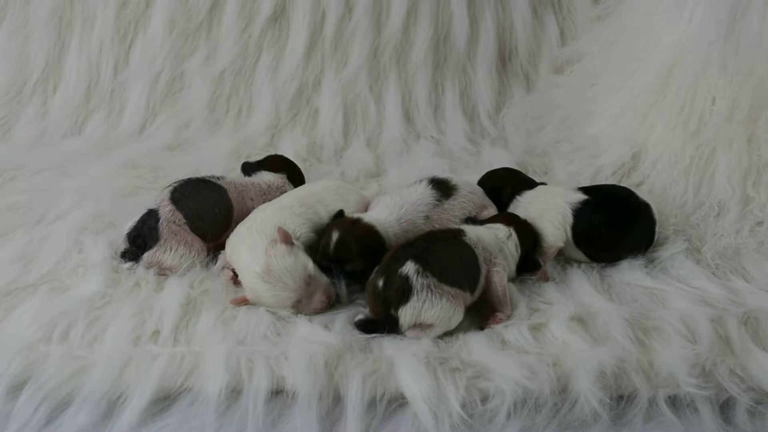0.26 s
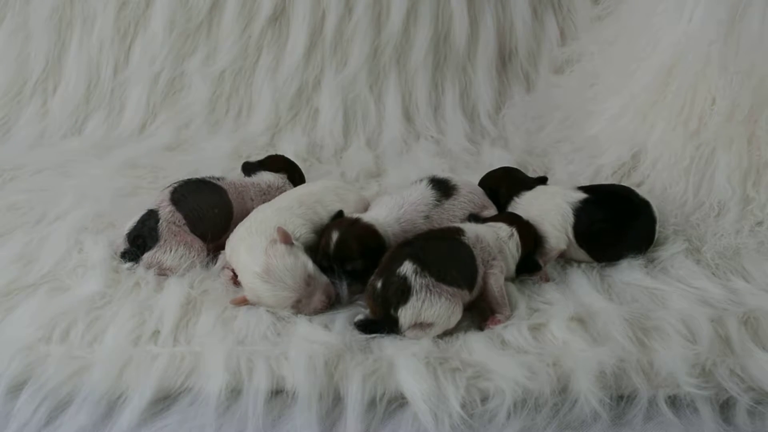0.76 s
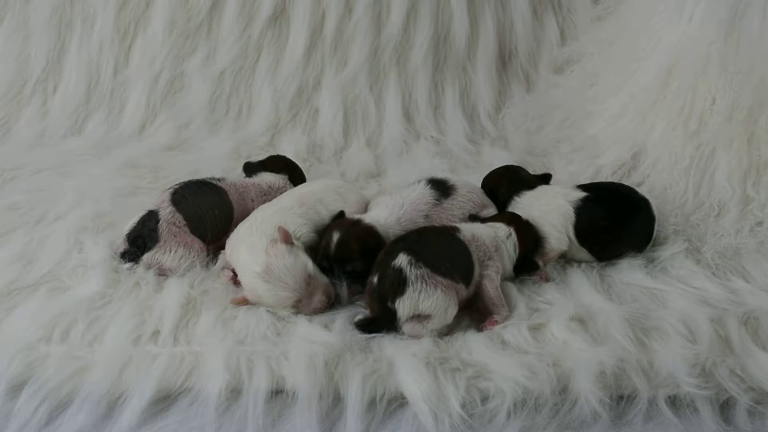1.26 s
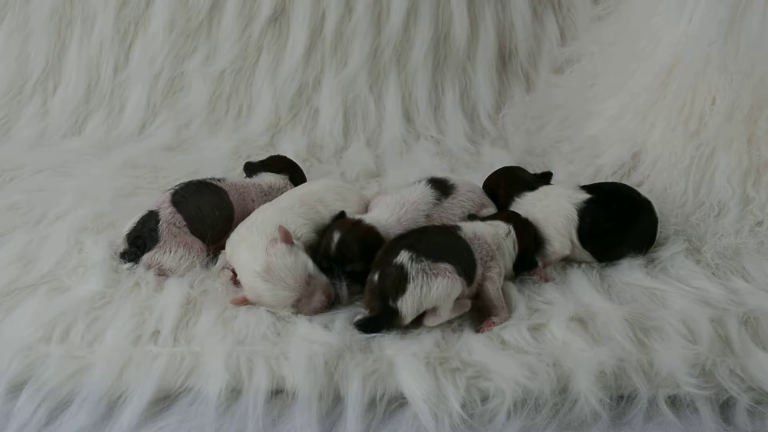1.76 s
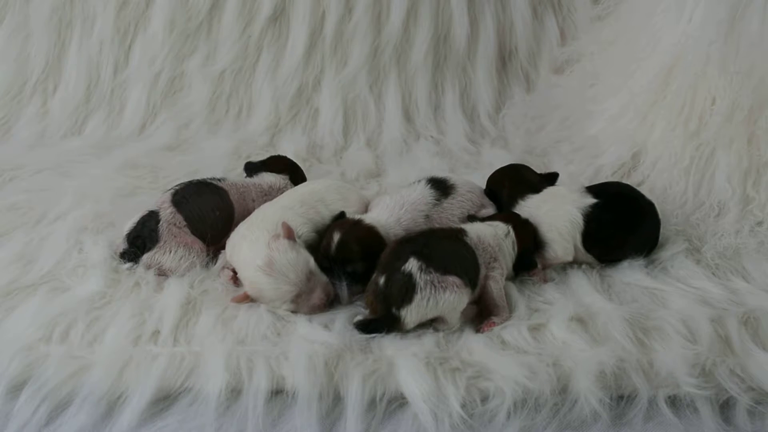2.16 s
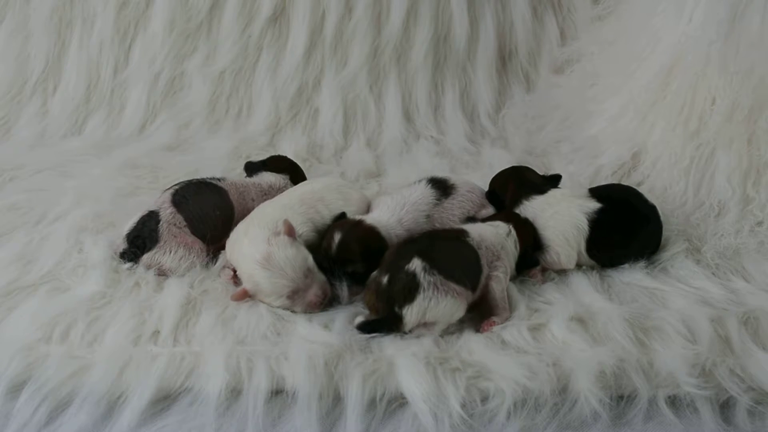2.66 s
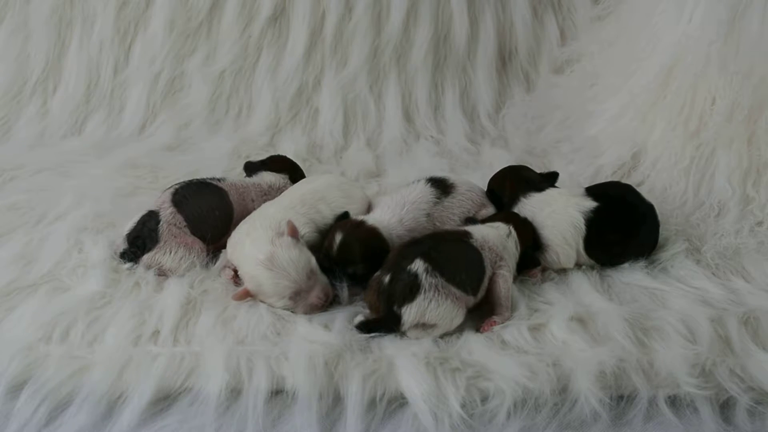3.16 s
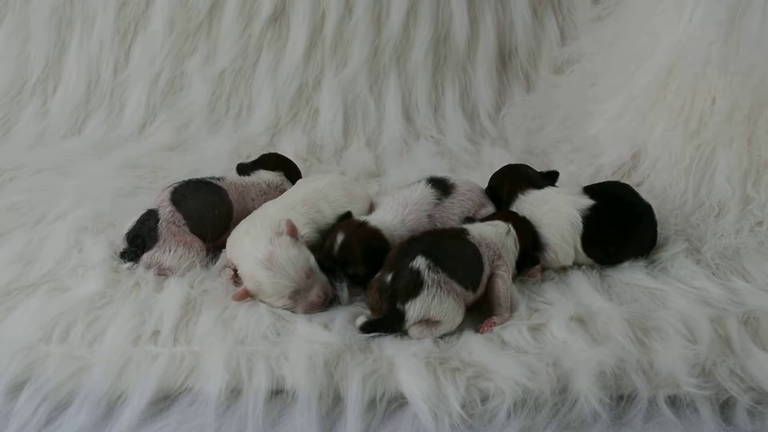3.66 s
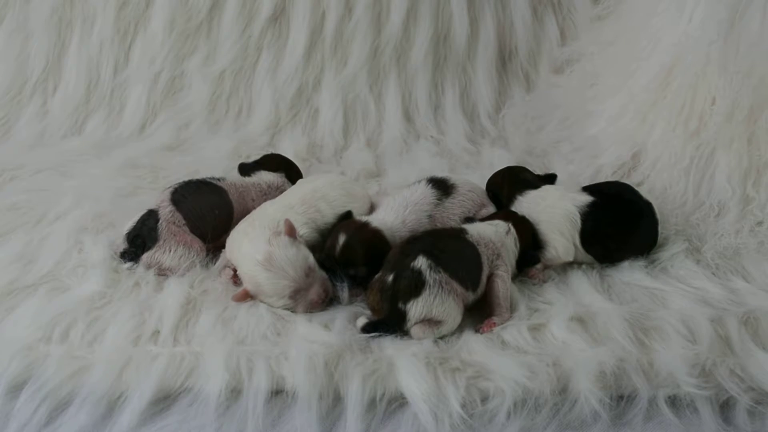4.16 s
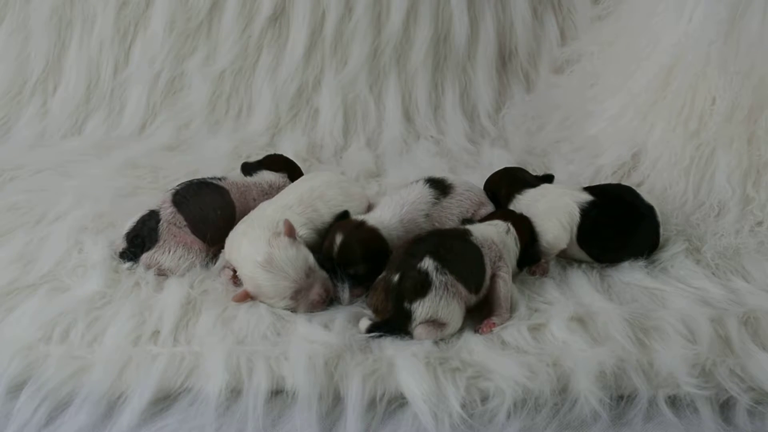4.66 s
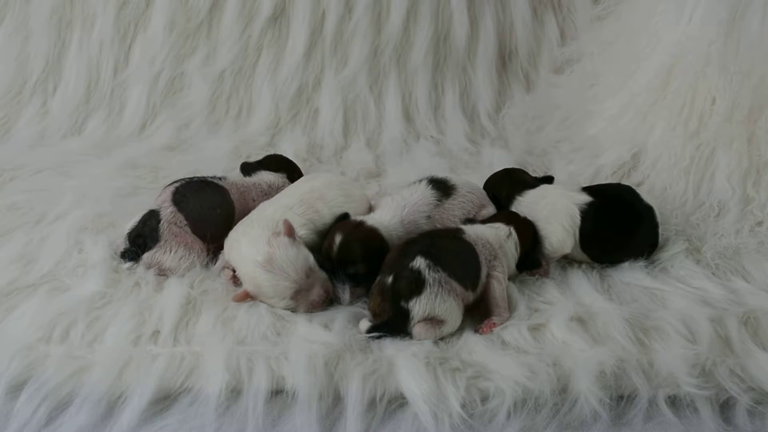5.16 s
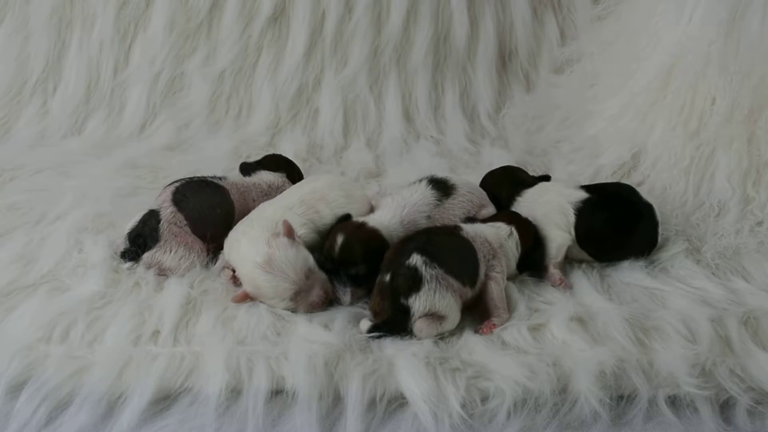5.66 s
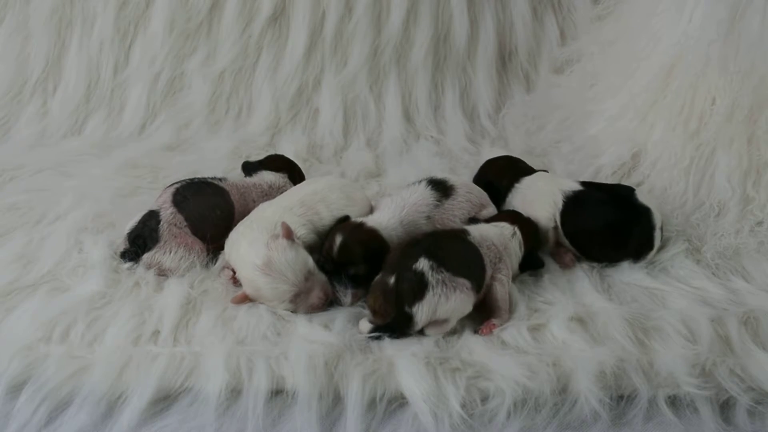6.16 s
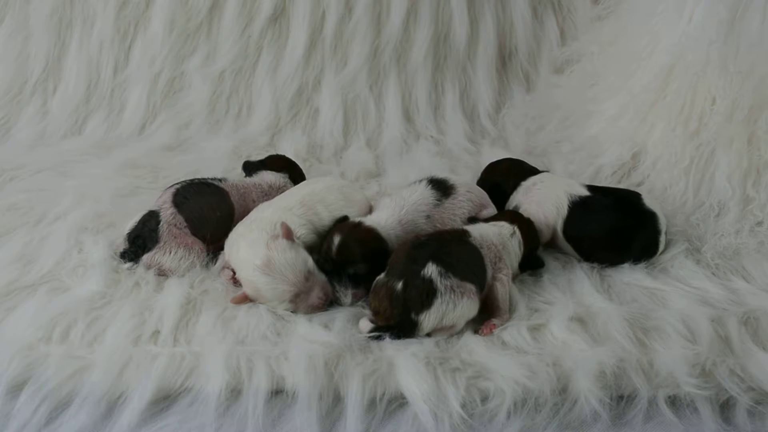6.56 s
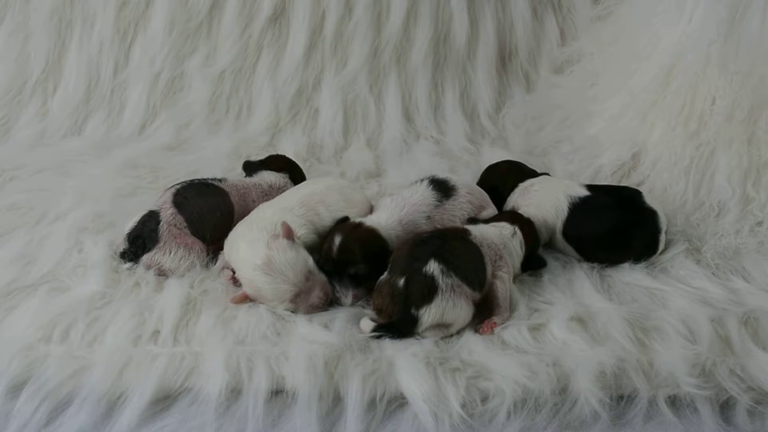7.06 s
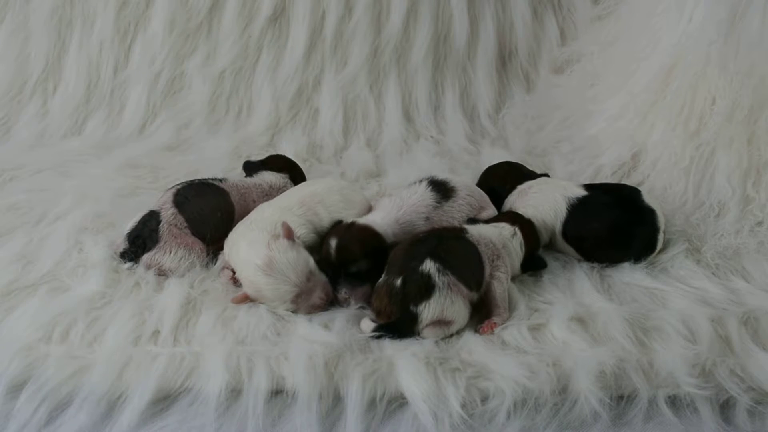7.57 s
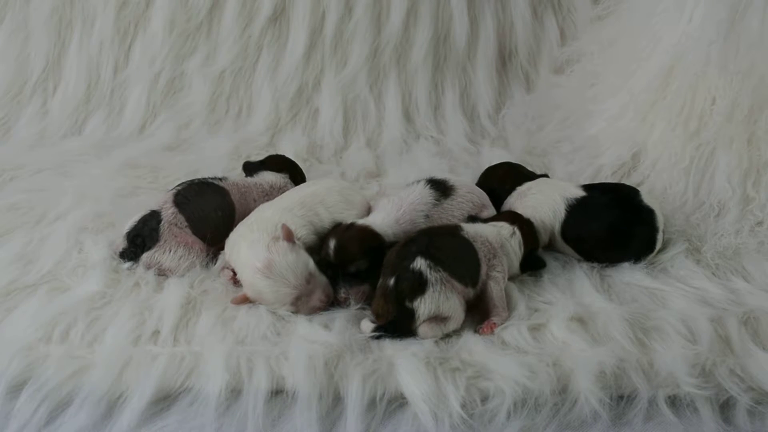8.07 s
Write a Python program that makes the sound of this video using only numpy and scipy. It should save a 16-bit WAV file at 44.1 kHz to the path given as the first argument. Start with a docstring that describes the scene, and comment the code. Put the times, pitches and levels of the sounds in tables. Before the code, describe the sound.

Newborn puppies cry about a metre from a phone in a small, softly furnished room, over steady soft hiss and very faint hum. Around 0.4 to 1.1 s come weak, short whimpers. At 1.2 s a long, piercing squeal starts abruptly, climbs with hoarse cracks until about 1.8 s, then slides down to 2.2 s, overlapped by a higher squeak and ending beside a rough grunt. After a brief lull with small grunts, a squeak at 2.8 s leads into a long wavering whine, rising then sinking until 4.5 s, with squeaks and whimpers across it. More squeaks follow to 5.2 s; a strong raspy whine and throaty grunts fill 5.2 to 6 s. A low, quiet whimper drifts from 6.2 to 7 s. From 7 s to the end near 8.3 s, grunts, weak whines and short whimpers return with a trace of high airy breath.

```python
"""Newborn puppies heaped on a thick fur rug, a metre from a phone: four voices overlap in thin wavering cries.
Each cry is a harmonic series on a gliding pitch curve, filtered by a tiny throat and mouth.
Hoarse grunts, uneven pulses and noise through throat resonances, come between and under the cries.
A narrow band of airy noise joins the last cries; a short diffuse tail answers as in a small soft room.
Steady coloured noise and faint mains hum lie beneath."""
import sys
import numpy as np
from scipy import signal
from scipy.fft import rfft, irfft
from scipy.io import wavfile
from scipy.ndimage import uniform_filter1d

SR = 44100
rng = np.random.default_rng(int(sys.argv[2]) if len(sys.argv) > 2 else 0)


def generate_wav(signal):
    """Clip the signal to [-1, 1] and save it as 16-bit WAV at the path in sys.argv[1]."""
    frames = np.transpose(np.atleast_2d(signal))
    scaled = np.clip(frames, -1, 1) * 32767
    pcm = np.round(scaled).astype(np.int16)
    wavfile.write(sys.argv[1], SR, pcm)


N = 367353

# Noise spectra, relative levels: frequency_hz, density_db (per Hz); mid is shared by both channels,
# side is opposite in sign between them
HISS_MID_SPECTRUM = [(15, -58), (25, -39.5), (104, -9.5), (198, -9.5), (274, -2.5), (631, -1.5),
                     (721, -2.5), (825, -4), (944, -3), (2170, -9), (2620, -11), (4740, -17.5),
                     (15500, -32.5)]
HISS_SIDE_SPECTRUM = [(15, -51), (25, -35), (140, -14), (289, -6.5), (684, -3.5), (894, -4.5), (970, -3.5),
                      (1050, -4.5), (3340, -11), (15500, -29.5)]
HISS_MID_DB, HISS_SIDE_DB = -56, -60.5  # rms
# Mains hum lines: frequency_hz, rms_db
HUM_LINES = [(60, -97), (120, -83.5), (300, -74)]
# Airy noise of the last cries: time_s, centre_hz, rms_db
AIR_TRACK = [(7.049, 10300, -95), (7.3, 10800, -82), (7.6, 11600, -84), (8.33, 11800, -83)]
AIR_WIDTH_HZ = 1200  # rate of the random levels that spread the band
# Grunts: start_s, length_s, level_db, change_db (from start to end)
GRUNT_EVENTS = [(0.38, 1, -64, -5), (2.145, 0.22, -42, -14), (2.465, 0.062, -52.5, -1),
                (2.652, .18, -56, 4.5), (2.95, 0.39, -61.5, 6), (3.276, 0.32, -54, -6),
                (3.987, 0.32, -57, 1), (4.378, 0.32, -53.5, -1), (4.7, 0.5, -55.5, -5.5),
                (5.206, 0.34, -43, -7.5), (5.478, 0.16, -40.5, -5.5), (5.64, 0.37, -44, -2),
                (6.08, 0.62, -65.5, 4.5), (6.56, 0.71, -57.5, -11), (7.03, 0.46, -47, -1),
                (7.492, 0.37, -49, 1.5), (7.893, 0.37, -54.5, -1)]
# Resonances of a grunting throat: frequency_hz, width_hz (of one pass), gain_db
GRUNT_RESONANCES = [(630, 490, -5.5), (1100, 760, 0.5), (1700, 840, 0), (2906, 470, -9.5),
                    (3530, 1200, -20.5), (11600, 1800, -39)]
# A longer grunt swells in more slowly: fixed attack plus a share of its length; release follows the length
GRUNT_ATTACK_S, GRUNT_ATTACK_SHARE, GRUNT_RELEASE_S = 0.017, 0.17, 0.076
# Hoarse stretches of fluttering folds: start_s, end_s, slips_per_s (mean rate), depth (0-1)
HOARSE_STRETCHES = [(1.495, 1.535, 50, .8), (1.58, 1.65, 43, .7), (1.705, 1.745, 50, .6),
                    (3.8, 3.9, 45, .3), (5.5, 5.6, 45, .35), (5.8, 5.95, 60, .25)]
# Raspy stretches of uneven cycles: start_s, end_s, rasp (0-1)
RASPY_STRETCHES = [(1.49, 1.54, .7), (1.58, 1.66, .7), (1.7, 1.75, .6), (2.08, 2.4, .5), (2.93, 3.45, .33),
                   (3.84, 3.95, .5), (4.26, 4.53, .7), (4.98, 5.3, .4), (5.3, 5.8, .28), (5.8, 6.0, .5),
                   (7.04, 7.9, .35), (7.9, 8.28, .15)]
RASP_JITTER, RASP_DB = .022, 3  # scale of random pitch (fraction) and strength (dB) at full rasp

# Pitch curves, one list per cry: time_s, pitch_hz
LONG_SQUEAL_CURVES = [
    [(1.226, 935), (1.236, 918), (1.296, 1004), (1.408, 1038), (1.454, 1169), (1.496, 1194), (1.544, 1296),
     (1.578, 1240), (1.634, 1404), (1.66, 1312), (1.78, 1487), (1.816, 1575), (1.846, 1412), (1.884, 1354),
     (1.932, 1146), (2.08, 1083), (2.13, 823), (2.17, 733), (2.218, 574), (2.239, 441)],
]
SQUEAK_CURVES = [
    [(2.007, 1602), (2.031, 1617), (2.059, 1838), (2.143, 1838), (2.195, 1576), (2.247, 1767),
     (2.319, 1480), (2.399, 1390)],
    [(2.814, 1275), (2.842, 1420), (2.873, 1656), (2.889, 1740)],
    [(3.05, 1476), (3.1, 1545), (3.17, 1324), (3.22, 1271), (3.3, 1376)],
    [(3.355, 1173), (3.4, 1010), (3.445, 981), (3.49, 1122), (3.55, 1081), (3.6, 1283), (3.64, 1105),
     (3.69, 1196), (3.72, 1160), (3.76, 1300), (3.795, 1180)],
    [(4.163, 830), (4.179, 856), (4.21, 1106), (4.246, 1210), (4.318, 830)],
    [(4.37, 894), (4.478, 1605), (4.518, 1203), (4.542, 1070), (4.59, 1006), (4.614, 923.5), (4.705, 955),
     (4.773, 997.6), (4.809, 993)],
    [(4.817, 940), (4.889, 716), (4.977, 703), (5.021, 988), (5.053, 1018), (5.1, 905), (5.124, 746),
     (5.188, 800)],
]
WHINE_CURVES = [
    [(2.933, 368), (2.959, 365.4), (3.013, 337.4), (3.161, 416), (3.211, 374.4), (3.305, 400),
     (3.331, 440.8), (3.391, 425.5), (3.485, 548), (3.515, 546.4), (3.601, 648), (3.651, 637.6),
     (3.731, 726), (3.879, 718.6), (3.907, 654), (3.947, 703.5), (4.009, 695), (4.091, 738.4), (4.127, 684),
     (4.171, 567), (4.217, 584), (4.253, 547), (4.297, 475.3), (4.323, 404.6), (4.445, 360.7), (4.467, 378),
     (4.546, 357.3)],
    [(4.55, 363), (4.598, 448), (4.629, 680), (4.677, 768)],
    [(5.24, 440.6), (5.292, 489), (5.32, 627), (5.34, 696), (5.47, 655), (5.508, 711), (5.546, 813.5),
     (5.62, 703.6), (5.686, 685.5), (5.756, 776), (5.78, 726), (5.848, 514), (5.902, 497), (5.966, 378.5)],
    [(7.252, 371), (7.294, 359.4), (7.332, 407.3), (7.404, 418.7), (7.508, 363.6), (7.568, 419.5),
     (7.626, 368.7), (7.704, 372), (7.758, 322.3), (7.84, 311.7)],
    [(7.87, 396), (7.894, 478), (7.906, 498), (7.97, 406), (8.042, 483), (8.114, 431), (8.161, 516)],
    [(8.173, 641), (8.213, 641.7), (8.249, 543), (8.305, 614), (8.329, 618)],
]
WHIMPER_CURVES = [
    [(0.431, 573), (0.467, 543), (0.503, 607), (0.547, 610)],
    [(0.563, 702), (0.591, 599), (0.615, 747), (0.655, 637)],
    [(0.75, 716), (0.79, 636.5), (0.846, 874), (0.882, 704), (0.966, 663), (1.034, 415), (1.098, 590)],
    [(3.352, 857), (3.396, 688), (3.42, 801), (3.456, 898), (3.544, 695), (3.6, 845), (3.64, 759),
     (3.759, 844), (3.799, 825)],
    [(3.843, 761), (3.875, 648), (3.923, 510.5), (4.007, 521.6), (4.039, 485), (4.119, 458)],
    [(4.873, 580), (4.941, 548), (4.985, 618), (5.033, 497), (5.076, 494.5), (5.128, 446), (5.176, 470)],
    [(5.192, 613), (5.208, 599), (5.272, 762), (5.3, 765)],
    [(5.332, 551), (5.36, 566.7), (5.436, 512.4), (5.492, 543.5), (5.6, 553), (5.823, 560), (5.859, 508.4),
     (5.903, 509), (5.931, 555.2), (6.126, 505.3), (6.17, 466), (6.242, 344)],
    [(6.246, 351.2), (6.306, 389.3), (6.362, 342), (6.421, 396.7), (6.621, 430), (6.697, 400.4),
     (6.79, 395), (6.852, 403), (6.88, 375.3), (6.988, 366), (7.06, 341)],
    [(7.04, 517), (7.188, 528), (7.2, 550), (7.24, 511)],
    [(8.042, 477.3), (8.062, 484), (8.09, 535.6), (8.149, 484)],
]
# Source and mouth of each cry: brightness_db (per octave), mouth_lift_db,
# and a list of place (0-1 through the cry), strength_db, mouth_hz
LONG_SQUEAL_SHAPES = [(0.16, 2, [(0, -48, 1860), (.2, -47, 960), (.4, -41.5, 1420), (.6, -36.5, 2830),
                      (.72, -39.5, 3300), (.9, -41, 1660), (1, -53.5, 1190)])]
SQUEAK_SHAPES = [ (-4.5, 1.5, [(0, -46, 1590), (.75, -47.5, 1580), (1, -73, 1500)]),
                 (-8, 2, [(0, -67, 1300), (.7, -50, 1600), (1, -63, 1700)]), (-4, 1.9, [(0, -55, 1500),
                 (.35, -46, 1400), (.7, -55, 1250), (1, -47, 1350)]), (-4.5, 14.4, [(0, -62, 3260),
                 (.1, -57, 3206), (.5, -52.5, 3430), (.85, -46, 3500), (1, -67, 3700)]),
                 (0.5, 5, [(0, -52.5, 1660), (.4, -47.5, 1220), (1, -49, 1660)]),
                 (1.5, 3.05, [(0, -58.5, 900), (.25, -46, 1603), (.38, -51, 2100), (.58, -49, 1880),
                 (1, -52.5, 2000)]), (-1.5, 5.2, [(0, -50.5, 1900), (.15, -52, 1520), (.65, -50, 2050),
                 (.8, -52, 1610), (1, -52.5, 1540)]), ]
WHINE_SHAPES = [ (-0.7, 2.5, [(0, -53.5, 1090), (.15, -47, 1220), (.38, -42.5, 1240), (.46, -46, 1240),
                (.55, -42, 1450), (.66, -46.5, 1430), (.73, -43, 1390), (.87, -46, 1199), (1, -54, 1090)]),
                (-1.6, 2, [(0, -51, 904), (.5, -46, 900), (1, -58, 750)]), (0.37, 1.1, [(0, -49.5, 1290),
                (.12, -43.5, 1320), (.45, -42, 1600), (.65, -43, 1500), (.88, -44.5, 1500),
                (1, -46, 1100)]), (0.12, 2.6, [(0, -54.5, 1500), (.25, -54, 1260), (.55, -54, 1480),
                (1, -58.5, 1202)]), (0.43, 2.5, [(0, -52, 1200), (.4, -55.5, 1260), (1, -58.5, 1912)]),
                (-0.3, 4.6, [(0, -53, 631), (.7, -59.5, 1140), (1, -50, 1247)]), ]
WHIMPER_SHAPES = [ (-1.5, 1.7, [(0, -58, 1100), (.7, -53.5, 1200), (1, -59, 1250)]),
                  (-8, 1.8, [(0, -53, 650), (.3, -46, 650), (1, -60, 700)]), (-2.5, 7.9, [(0, -57, 673),
                  (.6, -58, 655), (.75, -55.5, 990), (1, -69, 1200)]), (-2, 4.2, [(0, -49.5, 1600),
                  (.55, -46.5, 1630), (.78, -62, 1600), (.88, -46.5, 1640), (1, -57, 1570)]),
                  (2.5, 2.9, [(0, -44.5, 1480), (.3, -54, 1490), (1, -64, 1400)]),
                  (-4, 3.5, [(0, -64, 1100), (.5, -53.5, 1000), (1, -54.5, 950)]), (4, 2.6, [(0, -61, 1200),
                  (.6, -54, 1510), (1, -56, 1540)]), (0, 5, [(0, -58, 1120), (.13, -70, 1050),
                  (.25, -53.5, 1590), (.5, -52, 1070), (.75, -51, 1600), (.87, -52, 1030), (1, -53, 1060)]),
                  (-2.5, 6.1, [(0, -57.5, 1080), (.25, -53.5, 1540), (.34, -56, 1190), (.5, -56.5, 1220),
                  (.7, -55.5, 788), (.8, -58.5, 1130), (1, -62, 1098)]), (0, 2.7, [(0, -66, 1050),
                  (.5, -63, 1550), (1, -53, 1050)]), (-1.5, 3.7, [(0, -58, 1000), (.4, -49, 1044),
                  (1, -79, 1000)]), ]
# Throat and mouth transfer function of each pup: frequency_hz, gain_db
LONG_SQUEAL_TRACT = [(450, 6), (1000, 1), (1500, 2), (2000, 2.5), (3200, -2.5), (3800, -20.5), (5000, -43),
                     (6200, -44), (7200, -40), (9000, -32), (10500, -48), (12000, -46), (13500, -36),
                     (15500, -44)]
SQUEAK_TRACT = [(700, -8.5), (1000, 3), (1500, 2), (2000, -0.5), (3500, -5.5), (4300, -15.5), (5000, -39),
                (6000, -51), (9500, -44), (11000, -29), (12800, -36), (14000, -53)]
WHINE_TRACT = [(370, -9), (740, 1), (1100, 1), (1500, 2.5), (1900, 0), (2400, -11), (3000, -12.5),
               (3600, -17.5), (4300, -27), (5000, -46), (10000, -44.5), (11700, -39), (13000, -47),
               (15000, -57)]
WHIMPER_TRACT = [(400, -10), (600, -3.5), (800, 3.5), (1100, 1.5), (1500, 1.5), (2000, -6), (2500, -22),
                 (3500, -14.5), (5000, -62)]
# A pup that pushes its pitch up also pushes louder: dB per octave above the cry's median pitch
LONG_SQUEAL_EFFORT_DB, SQUEAK_EFFORT_DB, WHINE_EFFORT_DB, WHIMPER_EFFORT_DB = 7.5, 4, 4.5, 4
MOUTH_OCTAVES = 0.28  # half width of the mouth resonance, where its lift in dB falls to 1/e
GLIDE_LOSS_DB = .35  # the voice thins in fast glides: dB lost per octave a second
# Partials drop out deeply but swell only a little: shares of the patchiness, and cap on the random swell
LOW_PATCH_SHARE, HIGH_PATCH_SHARE, PATCH_TOP = .45, 1.8, .7
POP_DB, POP_S = 6.5, 0.025  # folds that snap into voice start loud: excess level and its decay time
ROOM_T60_S, ROOM_DB = 0.18, -11  # reverberation time, and tail energy relative to the dry sound
TOP_HZ = 15550  # upper band edge of the phone


def undb(db):
    """Amplitude ratio is ten to the power of level over twenty."""
    return 10 ** (np.asarray(db) / 20)


def level(x, db):
    """Scaling by the inverse rms sets the mean power."""
    return x * undb(db) / np.sqrt(np.mean(x ** 2))


def colour(table, hz):
    """A spectral envelope: dB interpolated on a log-frequency axis."""
    f, db = np.transpose(table)
    return np.interp(np.log(np.maximum(hz, 1)), np.log(f), db)


def walk(rate_hz, size=N):
    """Low-pass random fluctuation: levels held 1 / rate s and averaged twice, with a spread near 1."""
    hold = max(int(SR / rate_hz), 1)
    steps = np.repeat(rng.standard_normal(size // hold + 1), hold)
    return 1.3 * uniform_filter1d(uniform_filter1d(steps, hold), hold)[:size]


def ring(x, hz, width_hz):
    """Cascaded resonance: two passes of one peak steepen its skirts."""
    b, a = signal.iirpeak(hz, hz / width_hz, fs=SR)
    return signal.lfilter(b, a, signal.lfilter(b, a, x))


def hiss(table, db):
    """Stationary noise: a white spectrum weighted by a spectral envelope."""
    spectrum = rfft(rng.standard_normal(N))
    bin_hz = np.arange(len(spectrum)) * SR / N
    return level(irfft(spectrum * undb(colour(table, bin_hz)), N), db)


def hum():
    """Mains hum: a sum of steady sinusoids, each with rms equal to its peak over root two."""
    t = np.arange(N) / SR
    return sum(np.sqrt(2) * undb(db) * np.sin(2 * np.pi * hz * t) for hz, db in HUM_LINES)


def room(x, db):
    """Reverberation: convolution with exponentially decaying noise, delayed 8 ms and lacking treble."""
    t = np.arange(int(.5 * SR)) / SR
    decay = np.exp(-np.log(1000) * t / ROOM_T60_S)
    tail = rng.standard_normal(len(t)) * decay * (t > .008)
    tail = signal.lfilter(*signal.butter(1, 3500, fs=SR), tail)
    return signal.fftconvolve(x, tail * undb(db) / np.sqrt(np.sum(tail ** 2)))[:N]


def air():
    """Quadrature modulation: two random envelopes on a climbing carrier make a narrow band of leaking air."""
    t = np.arange(N) / SR
    s, hz, db = np.transpose(AIR_TRACK)
    phase = 2 * np.pi * np.cumsum(np.interp(t, s, hz)) / SR
    band = walk(AIR_WIDTH_HZ) * np.sin(phase) + walk(AIR_WIDTH_HZ) * np.cos(phase)
    return level(band, 0) * undb(np.interp(t, s, db)) * (t > s[0])


def grunts():
    """Source and filter: uneven pulses on a wandering low pitch, and leaking air, excite a slack throat."""
    t = np.arange(N) / SR
    push = 0
    for start, length, db, change_db in GRUNT_EVENTS:
        rise = (t - start) / (GRUNT_ATTACK_S + GRUNT_ATTACK_SHARE * length)
        fall = (start + length - t) / GRUNT_RELEASE_S + 1
        gate = np.clip(np.minimum(rise, fall), 0, 1)
        push = push + gate * undb(db + change_db * np.clip((t - start) / length, 0, 1))
    pitch_hz = 270 * (1 + .1 * walk(7) + .035 * walk(150))
    cycles = np.cumsum(pitch_hz) / SR
    # one pulse per cycle, of random strength
    pulses = np.diff(np.floor(cycles), prepend=0) * undb(2.5 * rng.standard_normal(N))
    # the air weakens through each cycle
    leak = np.exp(-(cycles % 1) / 0.98) * rng.standard_normal(N)
    source = level(pulses, 0) + level(leak, -6)
    # neighbouring resonances add with opposite signs
    tract = sum((-1) ** k * undb(gain_db) * ring(source, hz, width_hz)
                for k, (hz, width_hz, gain_db) in enumerate(GRUNT_RESONANCES))
    return level(tract, 0) * push * undb(1.0 * walk(6.9))


def flutter():
    """Fold instability: quick upward slips recur at a drifting rate in hoarse stretches, zero elsewhere."""
    t = np.arange(N) / SR
    out = np.zeros(N)
    drift = 1 + 0.13 * walk(30)
    for t0, t1, hz, depth in HOARSE_STRETCHES:
        gate = (t > t0) & (t < t1)
        out += depth * gate * np.sin(np.pi * np.cumsum(gate * hz * drift) / SR) ** 4
    return out


def rasp():
    """Aperiodicity: the unevenness of the cycles, 0-1, eased in and out."""
    t = np.arange(N) / SR
    amounts = sum(amount * ((t > t0) & (t < t1)) for t0, t1, amount in RASPY_STRETCHES)
    return uniform_filter1d(amounts, int(.03 * SR))


def pup(pitches, shapes, throat, effort_db, slips, rough, jitter=.008, waver=.007, patchy_db=3,
        shimmer_db=2, bend=.12, attack_s=.015, pop_db=0):
    """Source and filter: each cry is a harmonic series on its pitch curve, shaped by throat and mouth."""
    out = np.zeros(N)
    for pitch, (bright_db, mouth_db, shape) in zip(pitches, shapes):
        s, hz = np.transpose(pitch)
        i = np.arange(int(s[0] * SR), min(int(s[-1] * SR), N))
        size = len(i)
        # the folds are heavy enough to round every turn of the pitch
        hz = uniform_filter1d(np.interp(i / SR, s, hz), int(.014 * SR))

        place, *controls = np.transpose(shape)
        source_db, mouth_hz = (np.interp(np.linspace(0, 1, size), place, c) for c in controls)
        source_db = source_db + pop_db * np.exp(-(i - i[0]) / (POP_S * SR))
        source_db = source_db + effort_db * np.log2(hz / np.median(hz))
        octaves_per_s = np.abs(np.gradient(np.log2(hz))) * SR
        source_db = source_db - GLIDE_LOSS_DB * uniform_filter1d(octaves_per_s, int(0.013 * SR))
        source_db = source_db + RASP_DB * rough[i] * walk(300, size=size)

        hz = hz * (1 + RASP_JITTER * rough[i] * walk(350, size=size))
        hz = hz * (1 + jitter * walk(150, size=size) + waver * walk(29.7, size=size) + bend * slips[i])
        phase = 2 * np.pi * np.cumsum(hz) / SR
        voice = 0
        for k in range(1, int(throat[-1][0] / np.median(hz)) + 2):
            # brightness tips the lowest four partials; those above share the fourth's tilt
            db = source_db + bright_db * np.log2(min(k, 4)) + colour(throat, k * hz)
            db = db + mouth_db * np.exp(-(np.log2(k * hz / mouth_hz) / MOUTH_OCTAVES) ** 2)
            # partials, the upper ones most, swell and fade as the small mouth shifts, and tremble
            patch_share = LOW_PATCH_SHARE if k <= 3 else HIGH_PATCH_SHARE
            db = db + patch_share * patchy_db * np.minimum(walk(14.05, size=size), PATCH_TOP)
            db = db + shimmer_db * np.minimum(walk(39.78, size=size), 1)
            voice = voice + np.sqrt(2) * undb(db) * (k * hz < TOP_HZ) * np.sin(k * phase)
        edges = np.clip(np.minimum((i - i[0]) / attack_s, (i[-1] - i) / 0.0046) / SR, 0, 1)
        out[i] += voice * edges * (1 - .5 * slips[i])  # a slip weakens the voice
    return out


def scene():
    """Superposition: voices, reverberation, hum and mid noise are common to both channels; side noise is not."""
    slips, steady, rough = flutter(), np.zeros(N), rasp()
    long_squeal = pup(LONG_SQUEAL_CURVES, LONG_SQUEAL_SHAPES, LONG_SQUEAL_TRACT, LONG_SQUEAL_EFFORT_DB,
                      slips, rough, attack_s=.002, pop_db=POP_DB, jitter=.004, patchy_db=2, shimmer_db=1.0)
    squeaks = pup(SQUEAK_CURVES, SQUEAK_SHAPES, SQUEAK_TRACT, SQUEAK_EFFORT_DB,
                  steady, rough, attack_s=.002, pop_db=POP_DB, jitter=.005, shimmer_db=3)
    whines = pup(WHINE_CURVES, WHINE_SHAPES, WHINE_TRACT, WHINE_EFFORT_DB,
                 slips, rough, patchy_db=2.5, shimmer_db=2.8)
    whimpers = pup(WHIMPER_CURVES, WHIMPER_SHAPES, WHIMPER_TRACT, WHIMPER_EFFORT_DB,
                   steady, .4 * rough, waver=.004, shimmer_db=2)
    pups = long_squeal + squeaks + whines + whimpers + grunts() + air()
    mid = pups + room(pups, ROOM_DB) + hiss(HISS_MID_SPECTRUM, HISS_MID_DB) + hum()
    side = hiss(HISS_SIDE_SPECTRUM, HISS_SIDE_DB)
    return np.array([mid + side, mid - side])


def record(dry):
    """Band limiting: an elliptic low-pass filter gives the phone's steep upper cutoff."""
    return signal.sosfilt(signal.ellip(10, .2, 80, TOP_HZ, fs=SR, output="sos"), dry)


dry = scene()
out = record(dry)
generate_wav(out)
```